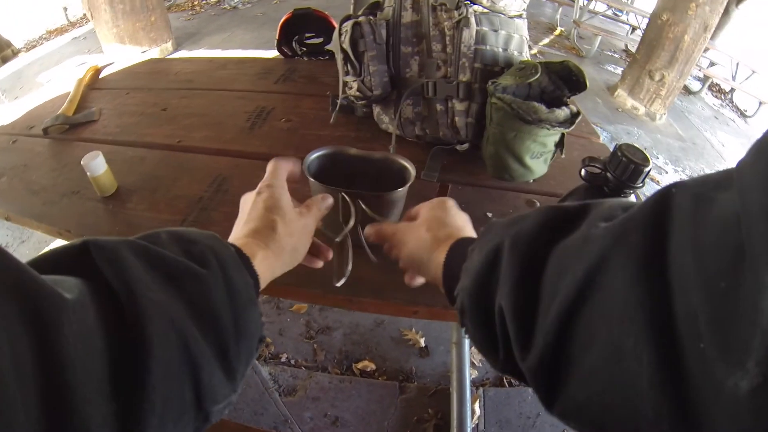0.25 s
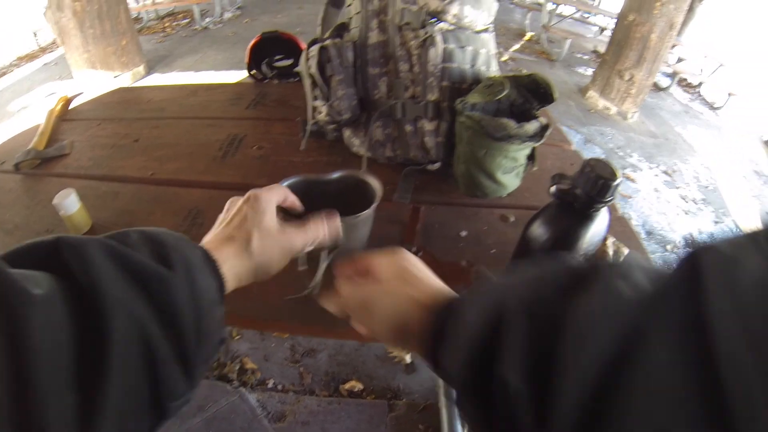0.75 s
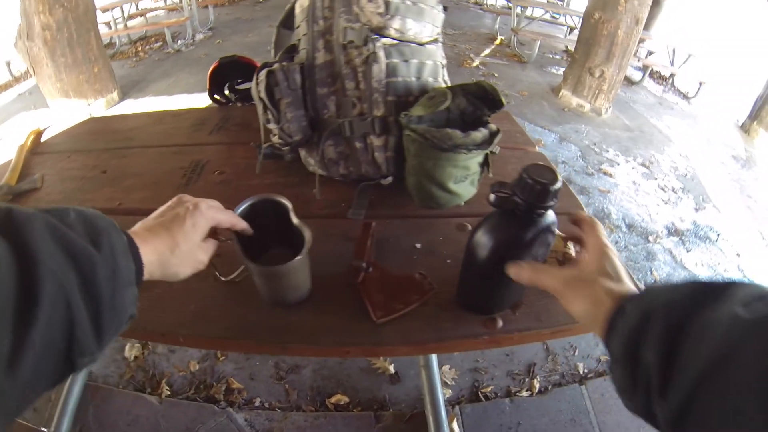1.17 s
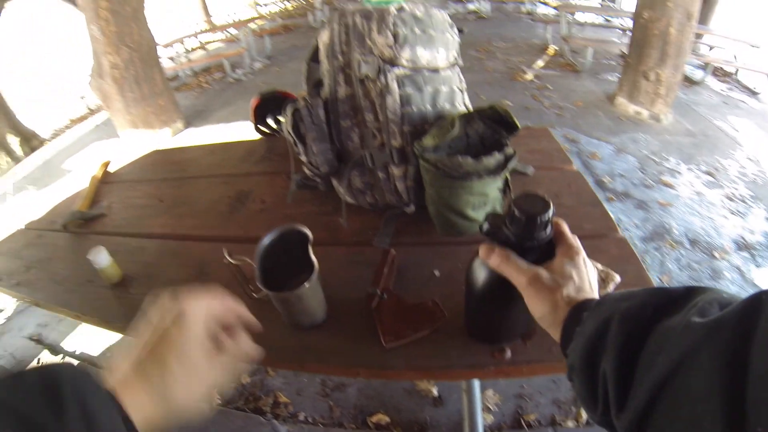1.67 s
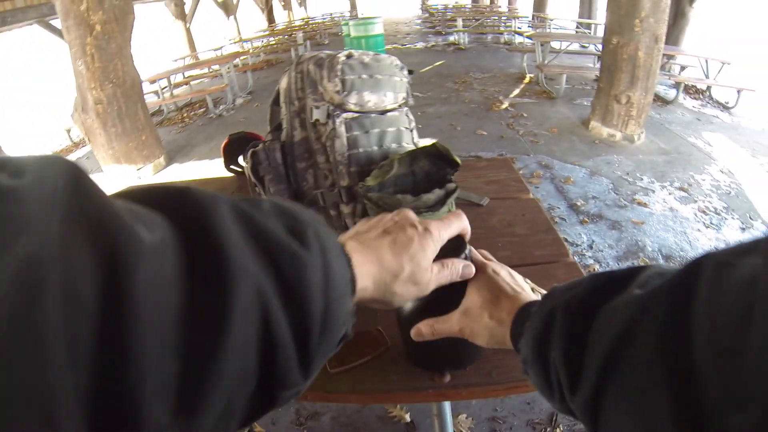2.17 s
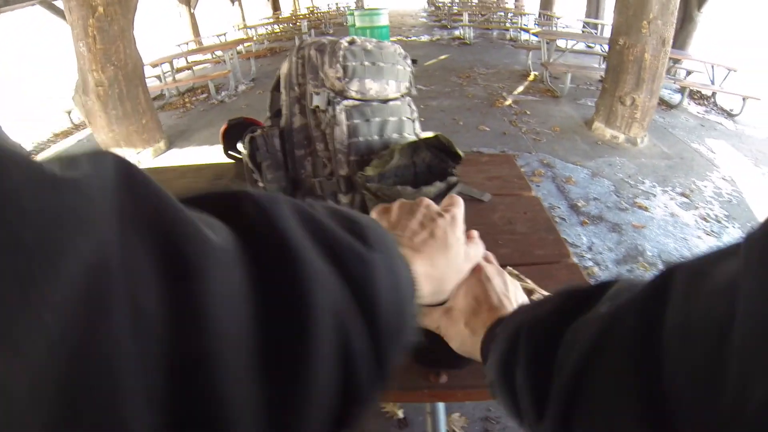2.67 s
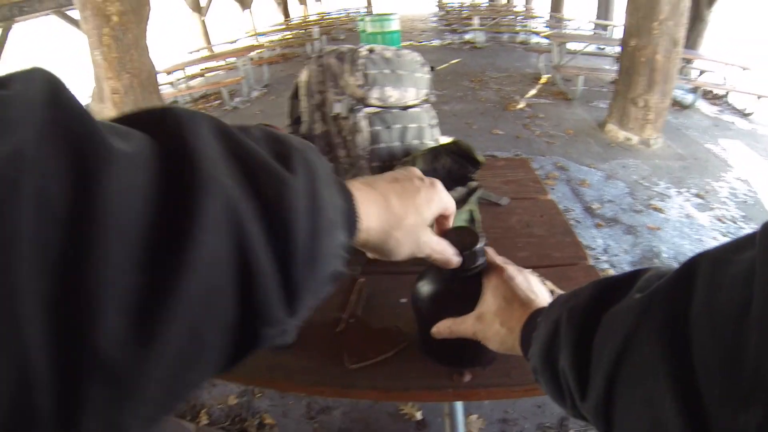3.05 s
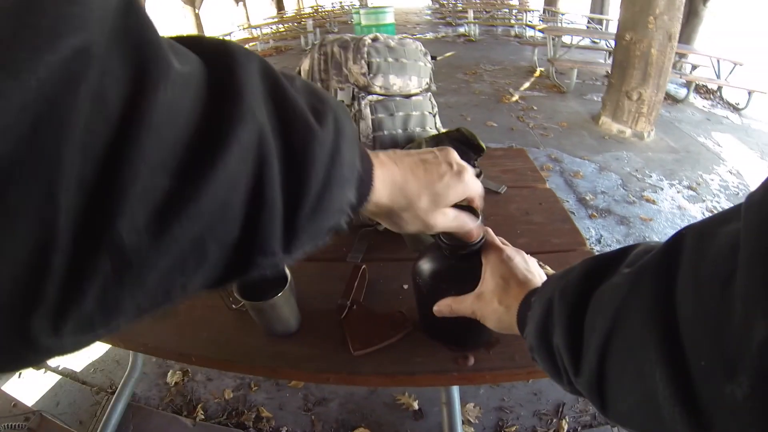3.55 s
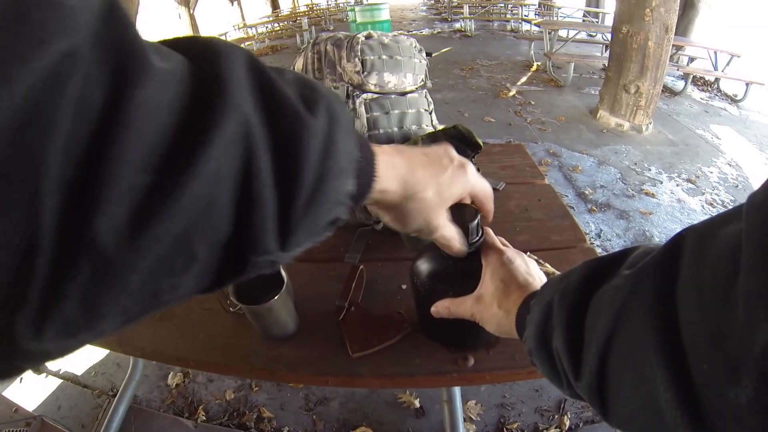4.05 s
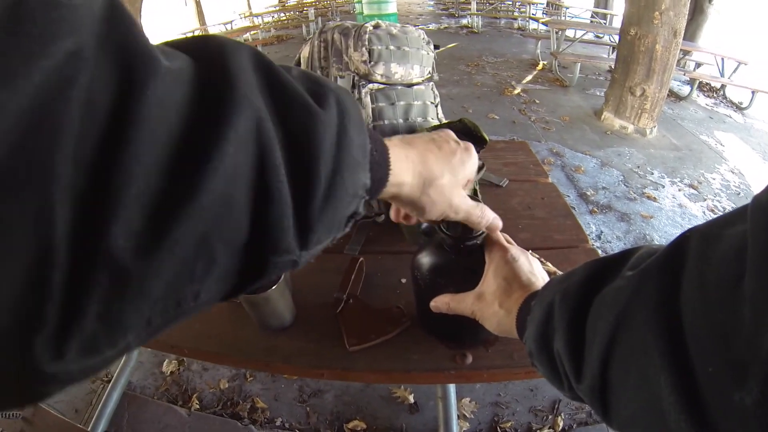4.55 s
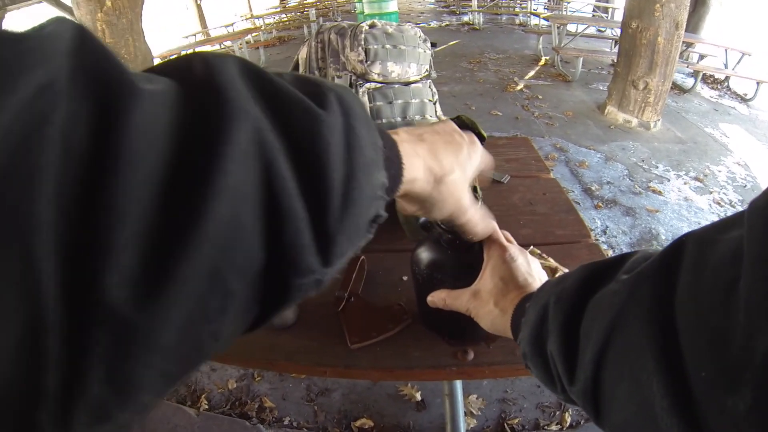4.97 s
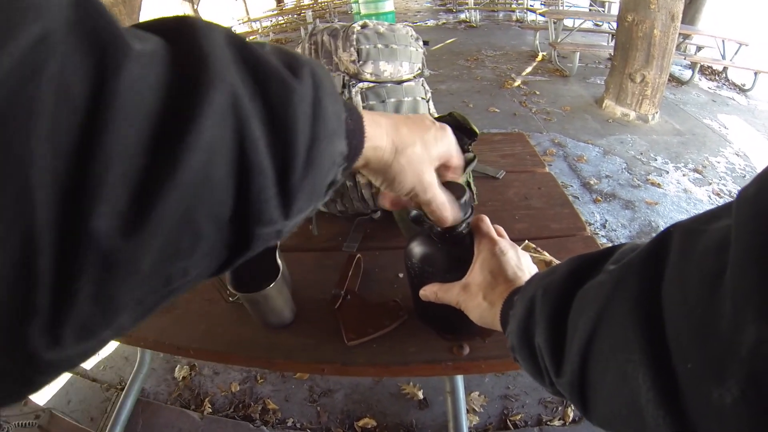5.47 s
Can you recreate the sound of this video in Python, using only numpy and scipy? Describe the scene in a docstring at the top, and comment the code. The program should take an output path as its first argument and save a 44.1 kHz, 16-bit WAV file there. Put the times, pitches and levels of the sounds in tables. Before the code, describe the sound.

Close handling sounds in the open air, with low, uneven wind rumble on the microphone, a soft rush and a faint distant hush. From about 0.1 s thin wire handles touch a metal cup; a cluster of light, tinny rattles runs from 0.26 to 0.62 s with soft low knocks beneath. A gritty metallic scrape swells around 0.7-0.8 s, then more rattling near 0.95 s leads to a sharp, bright clank at 1.05 s, quickly damped by the wooden table. Dull woody thumps follow around 1.45-1.6 s and 1.92-2.0 s. Fingers and sleeves rub quietly; a brief, deep wind thump comes near 2.6 s. Cap twisting continues with faint friction strokes and small plastic ticks, standing out as a hard double snap at 3.27 s, a lighter click at 4.19 s and another sharp snap at 4.49 s. From 5 s, quieter clicks, a short finger slip at 5.4 s and soft canteen taps close the scene at about 5.7 s.

```python
"""Metal cup and canteen under a shelter

Close by, at a picnic table under an open shelter, the wire handles of a thin metal cup rattle and scrape on its wall
and the cup is set down: chattering impacts and gritty noise ring its modes. Soft knocks on the table and, from 5 s
on, on the canteen ring low modes. Fingers twist the canteen's plastic cap: short modal clicks over coloured noise.
Wind rumbles on the microphone (a wandering low tone and noise) and rushes, over a steady distant outdoor hush."""
import sys
import numpy as np
from scipy import signal
from scipy.fft import rfft, irfft, next_fast_len
from scipy.io import wavfile
from scipy.ndimage import map_coordinates

SR = 44100
rng = np.random.default_rng(int(sys.argv[2]) if len(sys.argv) > 2 else 0)


def wav_record(signal):
    """Record a signal, one row per channel, as 16-bit PCM in the file named by sys.argv[1]."""
    frames = np.transpose(np.atleast_2d(signal))
    bounded = np.clip(frames, -1, 1)
    # unit amplitude maps onto the largest positive 16-bit level
    quanta = np.round(bounded * 32767).astype(np.int16)
    wavfile.write(sys.argv[1], SR, quanta)


N = 251811  # length [samples]

# Wind over time: (time [s], rumble level [dB], rush level [dB])
WIND_LEVELS = [(0, -47, -46.5), (.3, -44, -49.5), (.55, -42.5, -47.5), (.8, -41.5, -44.5),
               (1.2, -39, -52.5), (1.6, -46.5, -50), (2.0, -45, -47.5), (2.42, -44, -52),
               (2.58, -27.5, -53.5), (2.8, -43, -54), (3.1, -37, -48), (3.5, -41, -52.5),
               (3.85, -37.5, -50.5), (4.2, -39.5, -49.5), (4.6, -38, -53), (5.0, -48.5, -48.5),
               (5.33, -38, -49), (5.71, -44, -50.5)]
# Noise colours of wind on the microphone, wind in the trees and the far outdoors:
# (frequency [Hz], relative level per Hz [dB])
RUMBLE_COLOUR = [(7.1, 8), (12, -10), (22, -1), (38, -7.5), (51, -5), (80, -22), (110, -13), (140, -39),
                 (240, -120)]
RUSH_COLOUR = [(35, -26), (60, 2.5), (70, -3), (210, -9), (253, -11.5), (295, -10), (404, -13),
               (724, -16.5), (1210, -32.5), (1800, -31.5), (2340, -41), (3960, -120)]
HUSH_COLOUR = [(590, -15), (1000, -1), (1320, -11), (1810, -19), (3080, -29), (3800, -8), (4470, -21),
               (5130, -9.5), (5900, -16.5), (9720, -15), (13900, -24), (14800, -23), (16000, -58)]
HUSH_DB = -70.5
GUST_DB, GUSTS_PER_S = 2.5, 12  # depth [dB] and rate [knots/s] of the lumps in the rumble

# Soft knocks on the table and, from 5 s on, on the canteen:
# (time [s], level [dB], hardness [dB re level], edge [dB re level])
SOFT_KNOCKS = [(.322, -38, -3.5, -2), (.394, -36, -14, -8), (0.632, -35.5, -8, -24), (0.724, -33, -7, -7.5),
               (0.759, -43.5, -9, 2), (.8, -42, -16, -4), (.97, -32, -12, -12), (0.999, -43, -28, -20),
               (1.452, -26, -18.5, -11), (1.464, -31, -3, -12), (1.528, -34, -9.5, -16.5),
               (1.618, -39, -10, -14), (1.729, -50, -12, 0), (1.92, -30, -1, -6), (1.927, -30.5, -12, -6),
               (1.96, -35, -8, -11), (1.994, -37.5, -16, -20), (2.529, -42.5, 0.5, -3.5),
               (2.579, -36, -7, -8), (2.95, -40.5, 3, -4.5), (3.088, -34.5, -4, -13), (5.06, -45, -5, 2.5),
               (5.097, -53, 5.5, 9.5), (5.329, -44, 3.5, -5), (5.378, -41, -3, -1.5),
               (5.414, -41.5, 8.5, 4.5), (5.458, -44, 1.5, 0), (5.504, -53, 12, 12.5)]
# Modes of the table top, lent to the canteen knocks too: (frequency [Hz], level [dB], t60 before KNOCK_RING [s])
KNOCK_MODES = [(91, -30, 0.25), (116.4, -0.5, 0.23), (135.3, -5, 0.11), (171.5, -7, 0.22),
               (233.7, -5.5, 0.18), (304, 3, 0.1), (396, -1, 0.1), (477.6, 4, 0.078), (680.7, 5, 0.032),
               (745, -3, 0.026)]
KNOCK_CHATTER_S, KNOCK_RING = 0.024, 0.9  # chatter t60 [s], share of each mode's t60

# Clicks of the cap: (time [s], shell level [dB], hollow [dB re shell], neck [dB re shell],
# edge [dB re shell], chatter t60 [s])
CAP_CLICKS = [(2.325, -48, -17.5, -1, -53, 0.008), (2.5094, -64, -6, -3, -20.5, 0.0041),
              (2.5394, -61, -1, -1, -13, 0.0049), (3.0514, -62, 27, 14, -17, 0.0045),
              (3.2713, -18, -19, -38, -11.5, 0.002), (3.2749, -21.5, -7.5, -30, -18, 0.0019),
              (3.3744, -57, 8, 9, 6, .004), (3.4194, -51.5, 6, -9.5, -13, 0.0033),
              (3.6416, -53.5, -21, 6, -4.5, .0079), (3.918, -54, 12, 8.5, -5, 0.0049),
              (3.9634, -54, 1, 4.5, -5.5, 0.0066), (3.9795, -53, 18.5, 9.5, -18, 0.065),
              (4.0895, -52, 6, 7, -21, 0.0037), (4.0984, -52.5, 1.5, 7.5, -24, 0.0025),
              (4.1858, -40.5, 18, -26, -6.5, 0.00086), (4.2428, -55, -10, -4, -3, .006),
              (4.2503, -43.5, -5, -1, -3.5, .0086), (4.4, -44.5, -5, 4.5, -3.5, 0.044),
              (4.428, -55, 1, 4.5, -7, 0.0041), (4.4938, -23, -4, -46, -9.5, 0.00381),
              (4.6618, -58.5, -8.5, 9, 1, 0.02), (4.9214, -64, 0, -6, 4, 0.0036),
              (4.9367, -59.5, 16, 9.5, 16, 0.004), (5.0504, -43.5, -3, 6.5, -31, 0.0039),
              (5.0594, -47.5, 16.5, 9, -14, .051), (5.0944, -58.5, 5, 14, -10, 0.016),
              (5.2659, -44, 7, 3, -17, 0.013), (5.3204, -51.5, 15, 6.5, -1.5, 0.018),
              (5.3866, -57, 1, -5, 15, .04), (5.4165, -44, 13.5, 2, 5.5, 0.0066),
              (5.4844, -61, 25, 11, -15, 0.0069), (5.5039, -63, 16, 8, -24.5, 0.0042)]
# Modes of cap and neck: (frequency [Hz], level [dB], t60 before CAP_RING [s])
CAP_MODES = [(608, 1, 0.029), (743, 4, 0.033), (835, -0.5, 0.091), (947, -6, 0.12), (1360, -18, 0.0078),
             (1820, -22.5, 0.02), (1967, -2.5, 0.034), (2620, -6, 0.037), (3445, -27, 0.037),
             (3440, 1.5, 0.012), (3650, -6, 0.019), (3944, -12, 0.018), (5000, -1, 0.025),
             (6030, 3.5, 0.008), (8000, -5, 0.018), (9830, -1, 0.0054), (11600, -16, 0.0057)]
CAP_RING = 0.53  # share of each mode's t60 left under the fingers
# Sleeves and hands moving: (time [s], rub level [dB])
HAND_RUB = [(1.25, -68), (1.5, -59.5), (1.65, -62.5), (1.98, -58), (2.3, -60.5), (2.5, -66), (2.7, -69.5),
            (3.36, -62.5), (3.6, -67), (4.23, -69), (4.63, -65), (5.0, -67.5), (5.71, -67)]
# Fingers slipping over plastic: (centre [s], half length [s], rub level [dB], hiss level [dB])
FINGER_STROKES = [(1.568, 0.01, -61.5, -60.5), (1.767, .043, -66, -77.5), (1.933, 0.037, -61, -73),
                  (2.522, 0.0187, -58.5, -64), (2.584, 0.03, -57, -65.5), (2.75, 0.12, -65, -76.5),
                  (3.1, 0.021, -65, -71), (3.33, .075, -65.5, -76.5), (3.455, .058, -67, -65),
                  (3.784, .049, -62.5, -65.5), (4.073, 0.0279, -63, -61), (4.287, .015, -65, -71),
                  (4.395, 0.0384, -66, -61), (4.7, 0.0512, -62, -67.5), (4.815, 0.043, -67.5, -89.5),
                  (5.047, 0.038, -62.5, -60.5), (5.121, 0.039, -78.5, -81), (5.366, 0.026, -64, -65),
                  (5.412, 0.015, -47, -57.5), (5.452, 0.0133, -66.5, -68), (5.505, 0.0082, -72, -69)]
# Noise colours of friction hiss, skin rub and the droning canteen wall:
# (frequency [Hz], relative level per Hz [dB])
HISS_COLOUR = [(2060, -8), (3500, -7), (4300, -14), (6130, -12.5), (6900, -12.5), (9660, -10),
               (13200, -22.5), (14900, -21), (15500, -61)]
RUB_COLOUR = [(590, -9), (1000, 4.5), (1220, 0.5), (1810, 4), (2500, -1), (3710, -4.5), (4760, -13),
              (5650, -18.5), (6000, -29), (7800, -64.5), (13200, -120)]
DRONE_COLOUR = [(88, -61), (150, -2), (280, -6.5), (468, -6), (716, -9), (956, -7), (1110, -41),
                (1300, -11), (1690, -74), (2860, -120)]
DRONE_DB = 8.5  # canteen wall over the stroke's rub level

# Handle and table contacts on the cup; where the blow lands picks body and belly, a hard wire adds tick:
# (time [s], wall level [dB], body [dB re wall], belly [dB re wall], tick [dB re wall], chatter t60 [s])
CUP_CONTACTS = [(.0919, -51, 3.5, -20, -12, .013), (.2634, -53, -16.5, 6, -7, 0.068),
                (.2773, -43, -12, 11, -9, 0.0032), (.2856, -43.5, 1, -2.5, -5.5, .027),
                (.32, -39.5, 1.5, -2.5, -18, 0.028), (.3346, -37, -9, 2.5, -7, 0.04),
                (.3493, -40, -1, 9.5, 1.5, 0.019), (0.3596, -44.5, 6.5, 2, -4, 0.061),
                (.3744, -43, 1, 4, -17, 0.074), (.4214, -46, 1.5, -1.5, -6, .015),
                (.4405, -41, -3.5, 6.5, 4, 0.018), (.4758, -45, 0, -14, -13, 0.007),
                (.4954, -51, 9, 7, -9, 0.025), (.535, -47, 7.5, -8, -4, 0.032),
                (.5424, -43, 3.5, -1, -4, 0.013), (.5487, -44, -10, -15.5, 0.5, 0.026),
                (.6095, -49, 2, 8.5, -10, 0.051), (.6244, -47.5, -17, 1, -8, 0.046),
                (.9327, -39, -0.5, -2, -18.5, 0.022), (.9445, -36, -1.5, -12, -13, 0.069),
                (.9594, -44.5, 11, 5, -13, 0.11), (.9811, -38, -4, -3, -9.5, 0.035),
                (.9994, -43, -4, 5, -33.5, 0.013), (1.0354, -42, -14.5, -2, -21, 0.0116),
                (1.0468, -17.5, -7, -27, 1.5, 0.002), (1.0487, -25.5, -12, 2, 5, 0.0027),
                (1.051, -42.5, 2, -1, -0.5, 0.018), (1.0563, -35, -0.5, -13, -9.5, 0.19),
                (1.0774, -46, -2, -7, 0.5, 0.014), (1.0895, -35.5, 0, 2, 1, 0.012),
                (1.0925, -31.5, -1, -2, 3.5, 0.013), (1.1124, -47.5, -3, -12, 6, 0.063),
                (1.5738, -49.5, 0, -5, -15, 0.13)]
# Modes of the cup: (frequency [Hz], level [dB], t60 before the ring shares [s])
CUP_MODES = [(497, -5.5, 0.079), (685, 4.5, 0.079), (746, -1.5, 0.12), (979, -3.5, 0.1128),
             (1800, -0.5, 0.12), (2205, -3, 0.038), (2550, -7, 0.054), (2636.3, -3.5, 0.11),
             (3000, -10.5, 0.026), (3252, -11, 0.0866), (3630, 0, 0.0758), (3800, 3.5, 0.05),
             (4280, -3.5, 0.037), (4475, -3.5, 0.12), (4750, -0.5, 0.034), (5214, -4.5, 0.031),
             (5392, -5, 0.056), (5547, -11.5, 0.086), (5930, -11.5, 0.08), (6570, -16, 0.098),
             (7300, -9.5, 0.054), (7800, -16, 0.02), (8000, 2.5, 0.021), (9030, 0.5, 0.0166),
             (9650, -1, 0.011), (10040, 0.5, 0.0156), (10500, -6, .02), (11700, -7.5, 0.0186),
             (13400, -1, 0.0057)]
# The handle sliding on the cup: (time [s], level [dB])
HANDLE_SCRAPE = [(0, -57.5), (.35, -57), (.49, -59), (.62, -58), (.72, -49.5), (.8, -48.5), (.9, -61),
                 (.99, -54), (1.09, -57), (1.18, -58), (1.25, -63.5)]
# Mode balance added when the cup rests on the table: (frequency [Hz], gain [dB])
RESTING_COLOUR = [(700, -4), (976, 3.5), (1800, -0.5), (2600, 0.5), (3285, 13), (3700, -3.5), (4450, -11.5),
                  (5600, 6), (7000, -1.7)]
CUP_DOWN_S, CUP_DOWN_RING = 0.9, 0.74  # from this time [s] the table shortens the ring to this share
CUP_RING, CUP_LOOSE_S = 0.92, 0.011  # ring share of a loose handle; chatter [s] below which a grip damps it
SCRAPE_BODY_DB, SCRAPE_HISS_DB = 1, -12.5  # over the scraped wall
ROOF_DB, TOP_HZ = -13.0, 16400  # gain of the shelter's answer [dB]; band limit [Hz]


def amp(db):
    """Gain of a level in dB."""
    return 10 ** (np.asarray(db) / 20)


def unit(x):
    """x at rms 1."""
    return x / np.sqrt(np.mean(x ** 2) + 1e-20)


def along(points, hz):
    """(frequency [Hz], value) points read on a log frequency axis."""
    f, value = np.transpose(points)
    return np.interp(np.log(hz + 1), np.log(f + 1), value)


def curves(rows):
    """One level per sample for each column after the time; -120 dB outside the rows."""
    s, *columns = np.transpose(rows)
    return [np.interp(np.arange(N) / SR, s, c, left=-120, right=-120) for c in columns]


def wobble(rate):
    """A smooth random curve through rate knots a second."""
    knots = rng.standard_normal(int(N * rate / SR) + 4)
    return map_coordinates(knots, [np.arange(N) * rate / SR])


def filtered(x, response):
    """x through a response given as a function of frequency [Hz]."""
    m = next_fast_len(N + SR // 2)
    return irfft(rfft(x, m) * response(np.fft.rfftfreq(m, 1 / SR)), m)[..., :N]


def noise(spectrum, gritty_db, rate):
    """Coloured noise of rms 1, its level fluttering by gritty_db at rate knots a second."""
    grit = amp(gritty_db * wobble(rate)) * rng.standard_normal(N)
    return unit(filtered(grit, lambda hz: amp(along(spectrum, hz))))


def strike(modes, tilt, chatter, ring, scatter_db, direct, rise):
    """One contact: a dying chatter of tiny impacts rings the modes, weighted by tilt (Hz, dB)."""
    hz, db, t60 = np.transpose(modes)[:, :, None]
    hz = hz * (1 + .004 * rng.standard_normal(hz.shape))  # each contact detunes the modes a little at random
    t = np.arange(SR // 6) / SR
    gain = amp(db + along(tilt, hz) + scatter_db * rng.standard_normal(hz.shape))

    # The first cycles radiate straight from the contact; each mode builds up over rise cycles
    brief = direct * amp(-60 * t * hz / 16)
    decay = amp(-60 * t / (t60 * np.clip(ring, .05, 1.5)))
    onset = 1 - np.exp(-(t * hz / rise) ** 2)
    bare = onset * (decay + brief) * np.sin(2 * np.pi * hz * t)

    u = t[:SR // 16]
    impacts = np.abs(rng.standard_normal(len(u))) ** 3
    force = impacts * (1 - np.exp(-u / 0.00058)) * amp(-60 * u / max(chatter, 1e-3))
    rung = signal.fftconvolve(bare, force[None], axes=1)
    # The chatter leaves each mode the energy of its bare ring
    rung *= np.linalg.norm(bare, axis=1, keepdims=True) / np.linalg.norm(rung, axis=1, keepdims=True)
    return np.sum(gain * rung, axis=0)


def blows(rows, modes, tilt_of, ring_of, scatter_db, direct, rise):
    """All contacts of one table of rows; ring_of gives the ring share for a chatter length."""
    out = np.zeros(N + SR)
    for s, *levels, chatter in rows:
        sound = strike(modes, tilt_of(*levels), chatter, ring_of(chatter), scatter_db, direct, rise)
        out[round(s * SR):][:len(sound)] += sound
    return out[:N]


def air():
    """Wind rocks the microphone membrane at a wandering low rate and rushes in the trees; a far hush stays steady."""
    rumble_db, rush_db = curves(WIND_LEVELS)
    rocking_hz = 36 * np.exp(.18 * wobble(5.9))
    rocking = np.sin(2 * np.pi * np.cumsum(rocking_hz) / SR)
    lumps = amp(GUST_DB * wobble(GUSTS_PER_S))
    rumble = amp(rumble_db) * unit(lumps * (0.8 * rocking + 0.6 * noise(RUMBLE_COLOUR, 1.1, 7.3)))
    rush = amp(rush_db) * noise(RUSH_COLOUR, 1.8, 18)
    hush = amp(HUSH_DB) * noise(HUSH_COLOUR, 0.4, 11)
    return rumble + rush + hush


def roof(near):
    """A faint short answer from table top and roof: a decaying noise tail about 3 ms behind the near sound."""
    t = np.arange(SR // 4) / SR
    tail = rng.standard_normal(len(t)) * amp(-60 * t / 0.048)
    wet = signal.fftconvolve(np.pad(near, (130, 0)), tail / np.linalg.norm(tail))[:N]
    return filtered(wet, lambda hz: amp(along([(300, 6.5), (2000, -2.0), (10000, -7.5)], hz)))


def soft_knocks():
    """Knocks on table and canteen ring one set of low modes; hardness and edge weight the upper ones."""
    def tilt(db, hard, edge):
        return [(200, db), (280, db + hard), (400, db + hard), (470, db + edge)]

    rows = [(*row, KNOCK_CHATTER_S) for row in SOFT_KNOCKS]
    return blows(rows, KNOCK_MODES, tilt, lambda chatter: KNOCK_RING, scatter_db=1.5, direct=0.044, rise=0.53)


def cap():
    """Short dry plastic clicks ring cap and neck over the friction noise of fingers and sleeves."""
    def tilt(db, hollow, neck, edge):
        return [(600, db + hollow), (750, db + neck), (1000, db + neck), (1300, db), (2700, db),
                (3000, db + 0.13 * edge), (5200, db + 0.36 * edge), (6000, db + edge)]

    def squeak(hz):  # the cap sings faintly under the skin
        return 1 + 2.3 / (1 + ((hz - 6200) / 150) ** 2)

    centre, half, *levels = np.transpose(FINGER_STROKES)[:, :, None]
    swell = np.exp(-((np.arange(N) / SR - centre) / half) ** 2)  # each slip swells and fades
    rub, hiss = [np.sum(amp(db) * swell, axis=0) for db in levels]
    rubs = hiss * filtered(noise(HISS_COLOUR, 2.7, 250), squeak)
    rubs += amp(DRONE_DB) * rub * noise(DRONE_COLOUR, 1.17, 60)
    rubs += (rub + amp(curves(HAND_RUB)[0])) * noise(RUB_COLOUR, 0.76, 120)
    clicks = blows(CAP_CLICKS, CAP_MODES, tilt, lambda chatter: CAP_RING, scatter_db=3.3, direct=0.83, rise=1.0)
    return clicks + rubs


def cup_hits():
    """Contacts ring the thin metal; a grip or the table under the cup shortens the ring."""
    def tilt(db, body, belly, tick):
        return [(1100, db + body), (1600, db), (2250, db), (2500, db + belly), (2950, db + belly),
                (3200, db + 0.35 * tick), (6900, db + tick)]

    def ring(chatter):
        return CUP_RING * (1 - np.exp(-(chatter / CUP_LOOSE_S) ** 2))

    resting = [(hz, db + along(RESTING_COLOUR, hz), t60 * CUP_DOWN_RING) for hz, db, t60 in CUP_MODES]
    held = [c for c in CUP_CONTACTS if c[0] < CUP_DOWN_S]
    down = [c for c in CUP_CONTACTS if c[0] >= CUP_DOWN_S]
    return sum(blows(rows, modes, tilt, ring, scatter_db=3.5, direct=0.14, rise=1.13)
               for rows, modes in [(held, CUP_MODES), (down, resting)])


def cup_scrape():
    """The sliding handle feeds gritty noise to the cup's modes, which the hands damp and widen."""
    def damped(low, high):
        return lambda f: sum(amp(db) * 1j * f * 14 / t60 / (c * c - f * f + 1j * f * 14 / t60)
                             for c, db, t60 in CUP_MODES if low < c < high)

    wall_grit = noise([(1000, -1), (1600, 6.5), (4000, -6.5), (6500, -23)], 1.73, 150)
    wall = unit(filtered(wall_grit, damped(1200, 6500)))
    wall = unit(wall + 0.58 * noise(RUB_COLOUR, 0.98, 150))  # skin on the metal rubs without ringing
    body_grit = noise([(300, -9.5), (1200, -10.0), (2000, -19.5)], 2.7, 59.65)
    body = unit(filtered(body_grit, damped(300, 1200)))
    hiss = noise(HISS_COLOUR, 2.8, 130)
    slide = wall + amp(SCRAPE_BODY_DB) * body + amp(SCRAPE_HISS_DB) * hiss
    return amp(curves(HANDLE_SCRAPE)[0]) * slide


def scene():
    """Hands at work close by, in the open air, with the shelter's faint answer."""
    near = soft_knocks() + cap() + cup_hits() + cup_scrape()
    return (air() + amp(ROOF_DB) * roof(near) + near)[None]


def record(dry):
    """The treble ends steeply near 16 kHz; nothing passes from the band limit up."""
    def response(hz):
        return amp(along([(14800, -1.5), (15600, 0.5), (16400, -19)], hz)) * (hz < TOP_HZ)

    return filtered(dry, response)


dry = scene()
out = record(dry)
wav_record(out)
```